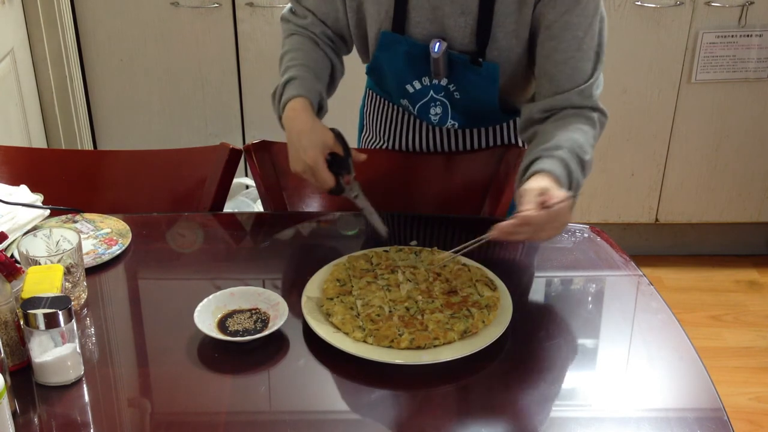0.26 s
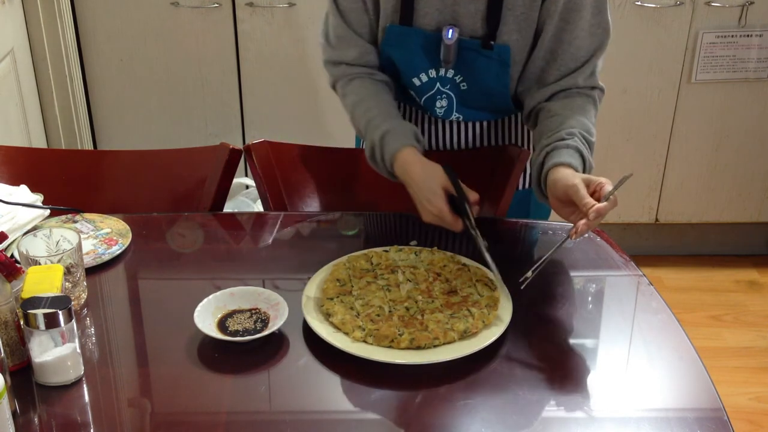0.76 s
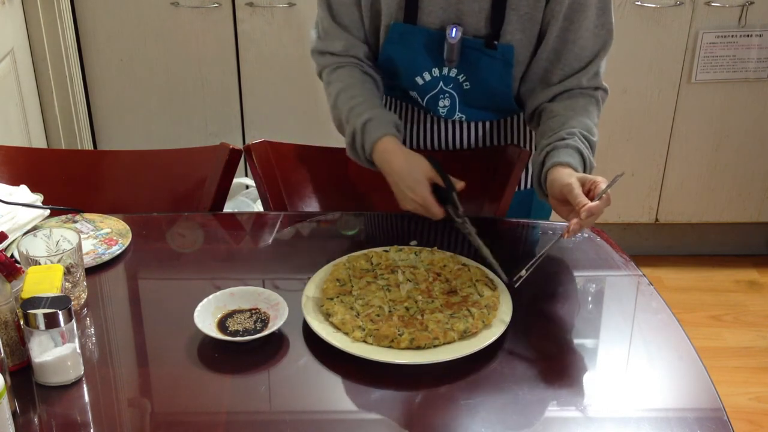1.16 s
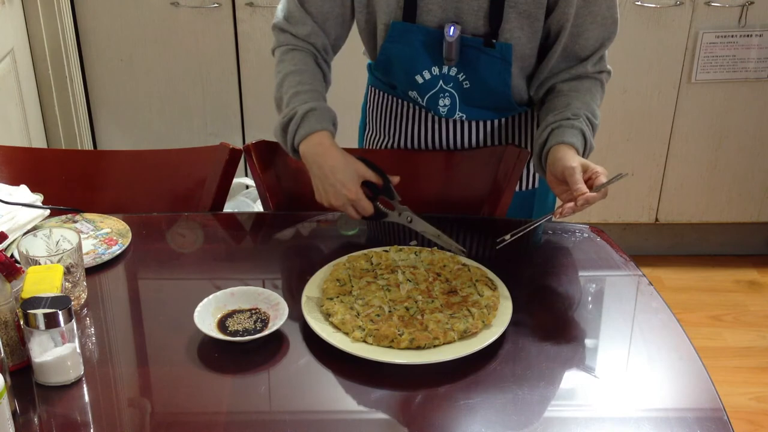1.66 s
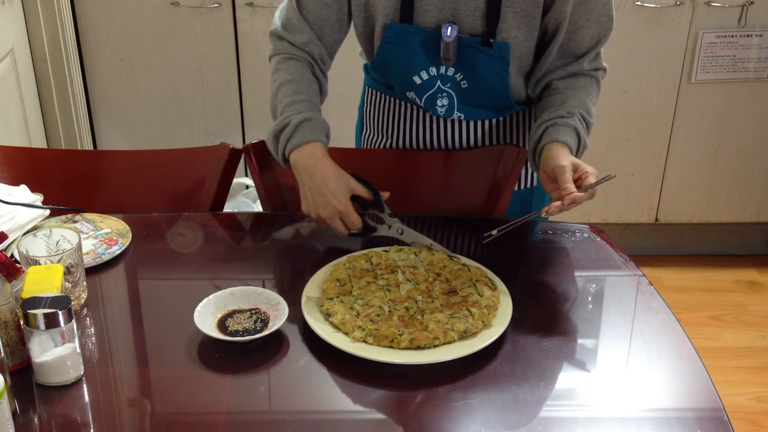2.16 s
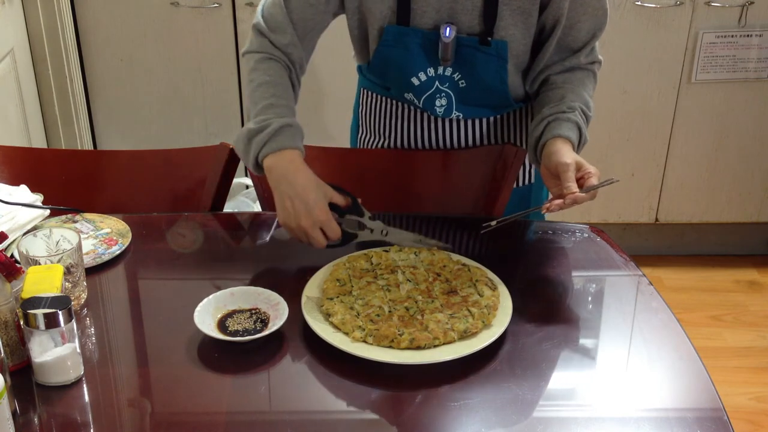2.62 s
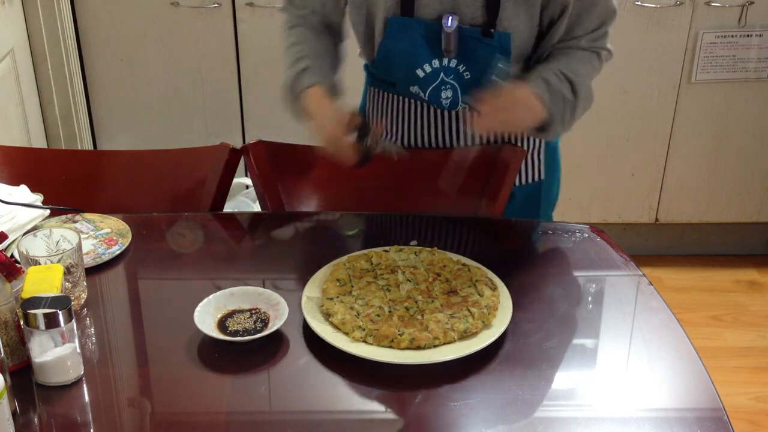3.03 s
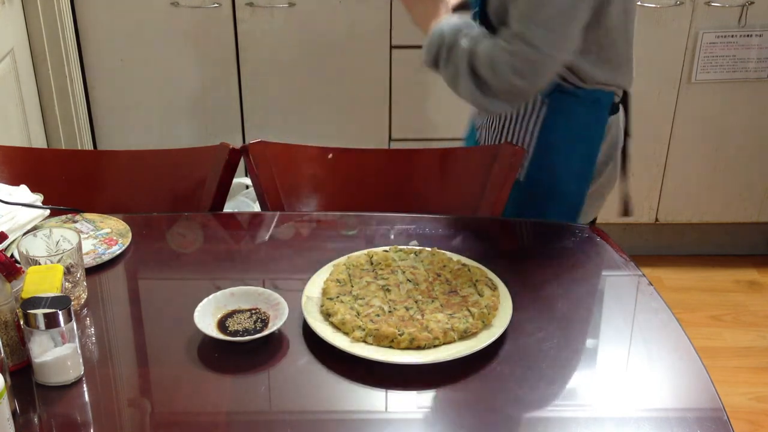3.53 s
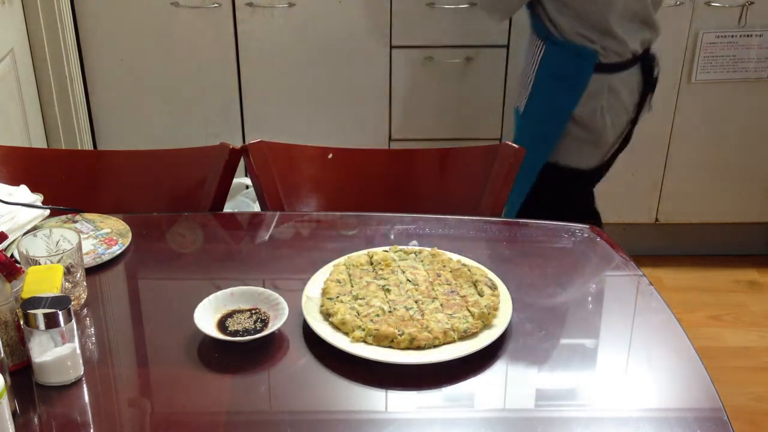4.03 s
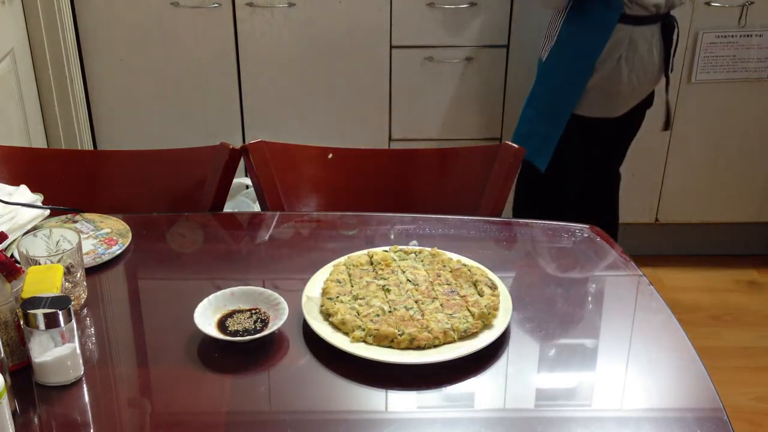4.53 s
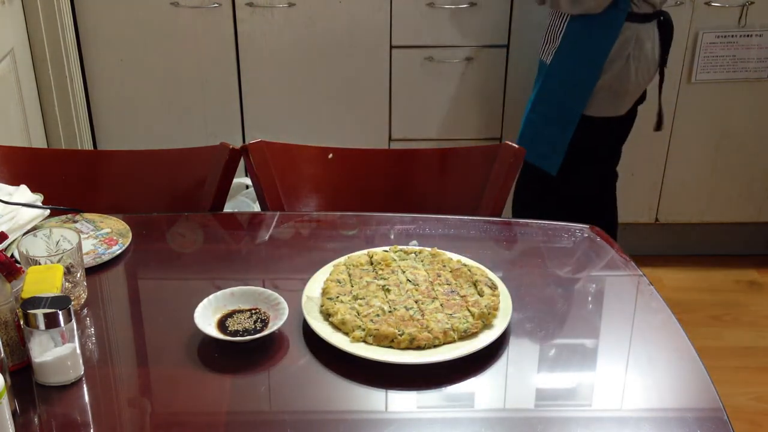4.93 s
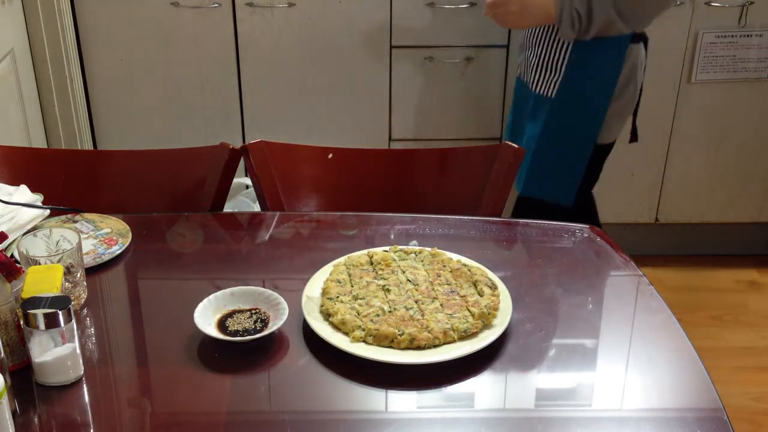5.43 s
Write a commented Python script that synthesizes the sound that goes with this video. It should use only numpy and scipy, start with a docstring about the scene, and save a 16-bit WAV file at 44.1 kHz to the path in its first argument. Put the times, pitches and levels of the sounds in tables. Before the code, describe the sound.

Sparse ceramic knocks and a brief gritty scrape, bright metal clinks in the hand, then clattering cutlery in a drawer, over quiet room hum.

```python
"""Kitchen scissors tap and scrape the rim of a ceramic plate: noise cracks ring its modes, dense grit is the drag.
Then they clink against steel chopsticks in the hand, where cracks ring the steel; fingers stop the early rings.
Last a cutlery drawer is opened and closed: its cutlery clatters in grains and tinkles, filtered noise booms.
Hollow knocks run through it and a small kitchen answers with a decaying noise echo; shaped noise makes the
room air, the fridge hum and the rustle of clothes underneath. Mono microphone."""
import sys
import numpy as np
from scipy import signal
from scipy.fft import rfft, irfft, next_fast_len
from scipy.io import wavfile
from scipy.ndimage import map_coordinates

SR = 44100
rng = np.random.default_rng(int(sys.argv[2]) if len(sys.argv) > 2 else 0)


def master(y):
    """Save y as 16-bit WAV."""
    cut = np.clip(np.atleast_2d(y).T, -1, 1)
    pcm = np.round(cut * 32767)  # scale
    wavfile.write(sys.argv[1], SR, pcm.astype(np.int16))


N = 250488

# ringing modes of the plate: pitch_hz
PLATE_PITCHES = [575, 1140, 1249, 1421, 1490, 1680, 2030, 2250, 2417, 2842, 3187, 3628, 3663, 4390, 4420,
                 5181, 6015, 6907, 7890, 8920, 10045, 11220, 12550, 13870]
# how each plate mode rings: relative_level_db, t60_s (before the sustain factor of the tap)
PLATE_DECAYS = [(-0.5, 0.15), (-10, 0.5), (-14, 0.39), (-1, 0.079), (-6, 0.083), (-4.5, 0.13), (-16, 0.2),
                (-13, 0.21), (-23.5, 0.12), (1, 0.099), (-3, 0.053), (-4.5, 0.11), (1, 0.17), (-11.5, 0.33),
                (-7.5, 0.22), (-6.5, 0.14), (-8.5, 0.23), (-17, 0.34), (-1.5, 0.088), (-12, 0.26),
                (-15, 0.13), (-17.5, 0.16), (-40, 0.11), (-31, .1)]
# colour of the ceramic crack and scrape: frequency_hz, relative_level_db
CERAMIC_COLOUR = [(120, -83), (200, -18), (842, -18), (1480, -4.5), (2560, -20.5), (3610, -4.5),
                  (4100, -21.5), (7090, -23.5), (8050, -29.5), (12900, -33.5), (15500, -78)]
# colour of the cutlery clatter: frequency_hz, relative_level_db
CLATTER_COLOUR = [(710, -34), (1200, -21), (1860, -25.5), (2620, -11), (3010, -15.5), (4480, -2.5),
                  (5730, -9), (10800, -18.5), (14100, -30.5), (15500, -104)]


def amp(db):
    """Turn dB into gain."""
    return 10 ** (np.asarray(db) / 20)


def unit(x):
    """Bring x to rms 1."""
    return x / np.sqrt(np.mean(x ** 2) + 1e-20)


def along(points, hz):
    """Read (Hz, value) points at hz, straight lines on a log frequency axis."""
    point_hz, value = np.transpose(points)
    return np.interp(np.log(hz + 1), np.log(point_hz + 1), value)


def curves(rows):
    """Draw one dB curve for each column after the time; silent outside the table."""
    time_s, *columns = np.transpose(rows)
    t = np.arange(N) / SR
    return [np.interp(t, time_s, column, left=-150, right=-150) for column in columns]


def wobble(rate):
    """A smooth random curve, rate knots a second."""
    knots = rng.standard_normal(int(N * rate / SR) + 4)
    return map_coordinates(knots, [np.arange(N) * rate / SR])


def filtered(x, response):
    """Shape x by a complex response of frequency."""
    size = next_fast_len(N + SR // 2)
    return irfft(rfft(x, size) * response(np.fft.rfftfreq(size, 1 / SR)), size)[:N]


def resonances(peaks):
    """Causal response of (Hz, width Hz, dB) resonances in parallel, with alternating signs."""
    def response(f):
        total = 0
        for k, (centre, width, db) in enumerate(peaks):
            peak = 1j * f * width / (centre * centre - f * f + 1j * f * width)
            total = total + (-1) ** k * amp(db) * peak
        return total
    return response


def noise(spectrum, grain_db):
    """Coloured noise of rms 1, its level flickering in grains of a few ms."""
    flickering = rng.standard_normal(N) * amp(grain_db * wobble(150))
    return unit(filtered(flickering, lambda hz: amp(along(spectrum, hz))))


def grit(rate, spread_db):
    """Tiny impacts, rate a second, with strengths spread at random; rms 1."""
    hits = rng.random(N) < rate / SR
    return unit(hits * rng.standard_normal(N) * amp(spread_db * rng.exponential(size=N)))


def swells(full_strength_s, hold_s, db, rise, fall):
    """Summed gains that rise to db before full_strength_s, hold and fall away; rise and fall in dB a second."""
    t = np.arange(N) / SR - np.asarray(full_strength_s)[:, None]
    before = np.maximum(-t, 0)
    after = np.maximum(t - np.reshape(hold_s, (-1, 1)), 0)
    drop = np.minimum(before * rise + after * fall, 200)
    return amp(np.asarray(db)[:, None] - drop).sum(axis=0)


def strikes(events, modes, colour, contact, scatter_db, free_db, damped_s=0):
    """Each contact cracks and rings the modes at new strengths; the grip leaves two modes freer than the rest."""
    grip_db_per_s = 1200  # from damped_s on, for whatever was struck before it
    out = np.zeros(N + SR)
    t = np.arange(SR // 3) / SR
    f = np.fft.rfftfreq(len(t), 1 / SR)
    hz, level_db, t60 = np.transpose(modes)[:, :, None]
    # crack t60 (s), ring tilt (dB per octave), share of the brightness that the ring follows
    crack_s, ring_tilt_db, ring_follows = contact
    for start_s, peak_db, tilt_db, ring_db, sustain, *free_hz in events:
        nearness = np.exp(-(np.log(hz / free_hz) / .04) ** 2)
        free = nearness.max(axis=1, keepdims=True)
        tilt = ring_tilt_db + ring_follows * tilt_db
        strength = level_db + tilt * np.log2(hz / 4000) + free_db * free
        strength = strength - strength.max() + rng.normal(0, scatter_db, hz.shape)

        decaying = amp(strength - 60 * t / (t60 * sustain))
        ring = (decaying * np.sin(2 * np.pi * hz * t)).sum(axis=0)
        gripped_s = np.maximum(start_s + t - damped_s, 0) * (start_s < damped_s)
        ring = ring * amp(-grip_db_per_s * gripped_s)

        crack_db = along(colour, f) + tilt_db * np.log2(f / 4000 + 0.33)
        burst = irfft(rfft(rng.standard_normal(len(t))) * amp(crack_db))
        crack = burst * amp(-60 * t / crack_s) * (1 - np.exp(-t / 0.00016))
        crack = crack / np.abs(crack).max()
        out[round(start_s * SR):][:len(t)] += amp(peak_db) * crack + amp(peak_db + ring_db) * ring
    return out[:N]


def rim_taps():
    """The blade knocks the plate: a short ceramic crack sets its modes ringing."""
    # blade on plate: start_s, crack_peak_db, brightness_db_per_octave, ring_under_peak_db,
    # sustain_factor, free_mode_hz, second_free_mode_hz
    taps = [(.9155, -8.5, 2.5, -16.5, 1.15, 10045, 7890), (1.288, -12, 2.5, -14, 0.76, 3580, 6015),
            (1.742, -10, -1, -19, .43, 1140, 1421), (1.849, -15.5, -3, -11.5, 0.26, 3650, 575),
            (1.951, -35, 5, -14, 0.77, 3640, 7890), (1.96, -34, -6, -17, .66, 3187, 6015),
            (1.975, -33.5, 5, -15, 0.78, 3520, 8920), (1.99, -18.5, 3, -22, .67, 8920, 7890),
            (2.0, -17.5, 0, -15, 0.71, 2842, 6015), (2.151, -35, -3.5, -24, .65, 3640, 4420),
            (2.218, -35.5, 7, -6, 0.98, 3700, 575), (2.234, -25.5, -2, -10, 0.28, 3700, 575),
            (2.32, -29.5, -7, -7, 0.76, 575, 3640), (2.364, -30, -3, -15, 0.9, 3750, 1249),
            (2.584, -51.5, 4, -8.5, 1.3, 4420, 6907), (2.66, -33.5, 2.5, -9.5, 0.74, 6015, 7890)]
    modes = np.column_stack([PLATE_PITCHES, PLATE_DECAYS])
    return strikes(taps, modes, CERAMIC_COLOUR, contact=(0.013, 1.7, 1.02), scatter_db=2.23, free_db=7.0)


def scrape():
    """The blade skips over the glaze: dense grit, heard bare and through the plate's modes, which the blade damps."""
    # drags over the rim: full_strength_s, hold_s, grind_db and body_db (both ahead of the plate's response)
    drags = [(1.992, 0.0072, -23, -72), (2.124, 0.018, -46.5, -61), (2.225, .018, -30, -49),
             (2.27, .025, -48, -64), (2.32, 0.032, -36, -50), (2.4, 0.012, -41.5, -66),
             (2.652, .01, -43, -72)]
    drag_rise, drag_fall, rock_fall = 1400, 750, 950  # dB per s
    full_strength_s, hold_s, grind_db, body_db = np.transpose(drags)
    grind_gain = swells(full_strength_s, hold_s, grind_db, drag_rise, drag_fall)
    push_gain = swells(full_strength_s, hold_s, body_db, drag_rise, rock_fall)
    skipping = grit(2200, spread_db=1.5) * amp(2.7 * wobble(70))

    damped_modes = []
    for hz, (db, t60) in zip(PLATE_PITCHES, PLATE_DECAYS):
        damped_modes.append((hz, 7 / t60, db - 20 * np.log10(1 / t60)))
    ringing = resonances(damped_modes)

    def rim_response(hz):
        return amp(10.5 + along(CERAMIC_COLOUR, hz)) + amp(26) * ringing(hz)

    rim = filtered(grind_gain * skipping, rim_response)
    # the whole plate rocks on the table
    rocking = filtered(push_gain * skipping, resonances([(PLATE_PITCHES[0], 120, 20.5)]))
    return rim + rocking


def hand_clinks():
    """Steel on steel in the hand: a bright tick rings the metal; fingers stop the early rings at damped_s."""
    # clinks: start_s, crack_peak_db, brightness_db_per_octave, ring_under_peak_db,
    # sustain_factor, free_mode_hz, second_free_mode_hz
    clinks = [(2.55, -42.5, -5, -40, .32, 6476, 11430), (3.034, -29.5, -10.5, -45, 0.27, 4240, 7849),
              (3.091, -44, -14.5, -30, .4, 5556, 6476), (3.2273, -12.5, -2, -22.5, 1.8, 5556, 3360),
              (3.2645, -22, 3, -19, .6, 3400, 10900), (3.2715, -15.5, -3, -17.5, 1, 3400, 10800),
              (3.2885, -28.5, 0, 0, 1.5, 4240, 7849), (3.423, -29.5, -2.5, -11, 0.29, 3930, 9200),
              (3.46, -44, 1, -18, .6, 9200, 14300), (3.479, -18, -4, -13, 0.74, 4240, 10000),
              (3.492, -25, -4.5, -15, 1.7, 4240, 12600), (3.507, -35, -4, -15.5, 0.92, 4240, 10900),
              (3.5, -32.5, -3, -9.5, 0.93, 2300, 11430), (3.52, -36, -6, -1, 0.92, 4240, 12600),
              (3.528, -29, 1, -18, 0.86, 3930, 3930), (3.818, -16.5, -1.5, -11, 0.58, 3930, 14300),
              (3.873, -20.5, -1.5, -21, .47, 3200, 9200), (4.046, -41, -5, -40, .5, 5556, 9200),
              (4.071, -30, 4, -19, 0.65, 6476, 8400), (4.0765, -11, 4, -3, 0.79, 10000, 8400),
              (4.082, -12.5, 7, -22, .37, 10000, 8400), (4.1215, -16.5, 3, -4.5, 1.02, 6476, 11430),
              (4.138, -39, -1, -28, .6, 6476, 8400)]
    # ringing modes of the steel: pitch_hz
    steel_pitches = [2300, 3200, 3400, 3930, 4240, 5556, 6476, 7849, 8400, 9200, 10000, 10900, 11430, 12600,
                     14300]
    # how each steel mode rings: relative_level_db, t60_s (before the sustain factor)
    steel_decays = [(-9.5, 0.023), (-9, 0.049), (-22.5, 0.046), (-12, 0.066), (-8.5, 0.039), (-14, 0.29),
                    (5, 0.036), (-8, 0.095), (1.5, 0.056), (-5, 0.14), (10, 0.025), (-32, .06),
                    (-30, 0.057), (-5, 0.07), (0, 0.056)]
    # colour of the steel crack: frequency_hz, relative_level_db
    tick_colour = [(88, -55), (150, -33), (2340, -18), (5520, -2.5), (6320, 2), (7110, 0.5), (8310, 2.5),
                   (9160, -7.5), (10100, -3), (14600, -7), (15800, -43)]
    modes = np.column_stack([steel_pitches, steel_decays])
    return strikes(clinks, modes, tick_colour, contact=(0.017, -1.3, 0.87), scatter_db=4.5, free_db=22.5,
                   damped_s=3.335)


def drawer():
    """A cutlery drawer is opened and closed; its loose cutlery clatters and the drawer booms. Jolts stir both."""
    # how loud the cutlery clatters: time_s, clatter_db
    clatter_curve = [(4.525, -68), (4.54, -50), (4.77, -45), (4.79, -30), (4.945, -29.5), (5.04, -56.5),
                     (5.09, -86), (5.15, -62), (5.29, -41.5), (5.36, -55), (5.46, -78), (5.55, -93)]
    # resonances of the loose cutlery: pitch_hz, width_hz, relative_level_db
    cutlery_modes = [(2075, 47, 3.5), (2600, 200, -12), (2960, 22, 0), (3070, 19, -1), (3800, 29, -14),
                     (4417, 160, 5), (5160, 78.6, -6), (5720, 40, 4.5), (6360, 80, 3.5), (6370, 31, -16),
                     (7240, 45, 2.5), (8750, 43, -18), (9900, 450, -27), (10600, 100, -23),
                     (10600, 160, -9), (11700, 220, -24), (12400, 21, -26), (12800, 58, -23),
                     (13100, 39, -28), (13300, 22, -32), (13600, 76, -38), (13800, 71, -32)]
    # resonances of the drawer: pitch_hz, width_hz, relative_level_db
    drawer_modes = [(138, 12, -17.5), (335.5, 39.5, -9), (485, 42, -9), (581.4, 16.6, 1.5),
                    (1029, 85, -14.5), (1640, 130, -22)]
    # jolts: start_s, crack_peak_db, brightness_db_per_octave, ring_under_peak_db,
    # free_mode_hz, second_free_mode_hz, boom_db
    jolt_rows = [(4.5324, -14, 6, -18.5, 4780, 3140, -44.5), (4.6452, -15.5, -6, -9, 4400, 5050, -30.5),
                 (4.782, -15.5, -6, -23, 4370, 6150, -46), (5.046, -46, -4, -25, 4400, 5300, -40.5),
                 (5.1025, -27.5, -8, -19, 3750, 6330, -38.5), (5.145, -22, 4, -16, 3850, 6000, -49),
                 (5.1591, -26.5, -11, -8, 4570, 5500, -37), (5.22, -23.5, 0, -20, 4446, 6320, -40.5),
                 (5.2772, -19, -4, -23, 4400, 6230, -27), (5.3379, -30.5, -11, -24, 4540, 5350, -39.5),
                 (5.4238, -49, -4, -8, 4900, 6900, -75), (5.4712, -48, 4, -11, 4860, 5560, -75),
                 (5.608, -48.5, 9, -32, 4960, 6500, -68)]
    start_s, peak_db, tilt_db, ring_db, free_hz, second_hz, boom_db = np.transpose(jolt_rows)

    moving = amp(curves(clatter_curve)[0])
    # around a jolt: clatter 16 dB under its peak, boom 8.9 ms late; both hold 12 ms, rise and fall in dB per s
    stirred = swells(start_s, .012, peak_db - 16, rise=4000, fall=350)
    boomed = swells(start_s + 0.0089, 0.012, boom_db, rise=1300, fall=470)
    clatter_gain = moving + stirred
    boom_gain = amp(-5) * moving + boomed

    flickering = grit(5000, spread_db=-2.5) * amp(1.44 * wobble(60))
    grains = filtered(flickering, lambda hz: amp(along(CLATTER_COLOUR, hz)))
    metallic = unit(filtered(grains, resonances(cutlery_modes)))
    clatter = unit(unit(grains) + amp(-1) * metallic)
    boom = unit(filtered(rng.standard_normal(N) * amp(2.3 * wobble(40)), resonances(drawer_modes)))

    modes = [(hz, db, 3.4 / width) for hz, width, db in cutlery_modes]  # a wide resonance dies fast
    sustain = np.ones_like(start_s)
    rows = np.column_stack([start_s, peak_db, tilt_db, ring_db, sustain, free_hz, second_hz])
    jolts = strikes(rows, modes, CLATTER_COLOUR, contact=(0.034, .4, .01), scatter_db=4, free_db=34)
    rattle = clatter_gain * clatter + amp(10.5) * tinkles(clatter_gain, count=900, t60=0.084)
    return rattle + boom_gain * boom + jolts


def tinkles(gain, count, t60):
    """Many small pieces touch and ring briefly, each at its own pitch."""
    when, pitch, size, life = rng.random((count, 4)).T[:, :, None]
    audible = gain > 3e-5  # touches fall only where the cutlery clatters
    start = np.searchsorted(np.cumsum(audible), 1 + when * (audible.sum() - 1))
    hz = 2400 * amp(15 * pitch)
    sample = np.arange(SR // 12)
    t = sample / SR
    level_db = along(CLATTER_COLOUR, hz) - 25.5 * size - 60 * t / (t60 * (0.3 + life))
    notes = gain[start] * amp(level_db) * np.sin(2 * np.pi * hz * t)
    return np.bincount((start + sample).ravel(), notes.ravel(), N + SR)[:N]


def knock():
    """Damped hollow notes of table, handles and drawer."""
    # hollow knocks: start_s, level_db, pitch_hz, t60_s
    knocks = [(1.23, -35.5, 268, 0.023), (3.160, -38.5, 973, 0.048), (3.227, -23, 263, 0.01),
              (4.075, -33, 243, 0.022), (5.047, -32, 627, 0.04), (5.29, -35.5, 146.3, 0.22),
              (5.54, -47, 122, 0.044)]
    start_s, level_db, hz, t60 = np.transpose(knocks)[:, :, None]
    t = np.maximum(np.arange(N) / SR - start_s, 0)
    soft_onset = 1 - np.exp(-t / 0.0022)
    return (amp(level_db - 60 * t / t60) * np.sin(2 * np.pi * hz * t) * soft_onset).sum(axis=0)


def kitchen(x, turn_s=.3):
    """Each frequency of the echo dies at its own speed; the echo pattern is drawn anew every turn_s."""
    # decay of the room: frequency_hz, t60_s
    room_decay = [(200, 0.65), (1500, 0.47), (3000, 0.32), (7000, 0.28), (14000, 0.16)]
    out = np.zeros(N + SR)
    step = round(turn_s * SR)
    for start in range(0, N, step):
        hz, t, cells = signal.stft(rng.standard_normal(SR // 2), SR, nperseg=256)
        dying = cells * amp(-60 * t / along(room_decay, hz)[:, None])
        tail = signal.istft(dying, SR, nperseg=256)[1]
        wet = signal.fftconvolve(x[start:start + step], tail / np.linalg.norm(tail))
        out[start + 150:][:len(wet)] += wet  # the echo starts 150 samples late
    return out[:N]


def background():
    """Steady room air and fridge hum; clothes rustle and feet shuffle as the cook moves."""
    # clothes and steps: time_s, shuffle_db, rustle_db
    movement = [(0.0, -63, -77), (0.33, -65.5, -83), (0.87, -63, -69), (1.58, -65, -82), (2.39, -62.5, -70),
                (2.7, -65.5, -79.5), (3.02, -63.5, -69.5), (3.45, -63, -63.5), (3.89, -59.5, -75),
                (4.08, -61.5, -55), (4.22, -66, -64.5), (4.35, -53.5, -54), (4.55, -66, -70),
                (5.3, -52.5, -60), (5.46, -60, -68), (5.68, -66.5, -65)]
    # colour of the shuffling feet: frequency_hz, relative_level_db
    shuffle_colour = [(100, -51), (250, -1.5), (500, 2), (1200, 0.5), (2500, -10.5), (5000, -38)]
    # colour of the clothes: frequency_hz, relative_level_db
    rustle_colour = [(1000, -31), (2500, -3.5), (4500, -6.5), (6500, -2), (9000, -8.5), (15000, -24)]
    # colour of the room air: frequency_hz, relative_level_db
    air_colour = [(15, -82), (25, -44), (117, -20), (141, -11), (180, -5), (212, -8.5), (294, -4),
                  (418, -8), (519, -16), (594, -10), (1490, -29.5), (1620, -26), (7170, -26), (14500, -31),
                  (16200, -67.5)]
    # fridge hum: pitch_hz, width_hz (of one filter pass), level_db
    fridge_hum = (188, 2.9, -66.5)
    shuffle_db, rustle_db = curves(movement)
    hz, width, hum_db = fridge_hum
    narrow = resonances([(hz, width, 0)])
    hum = unit(filtered(rng.standard_normal(N), lambda f: narrow(f) ** 2))  # two passes
    shuffle = amp(shuffle_db) * noise(shuffle_colour, grain_db=1.0)
    rustle = amp(rustle_db) * noise(rustle_colour, grain_db=1.5)
    air = amp(-59.5) * noise(air_colour, grain_db=0.83)
    return air + amp(hum_db) * hum + shuffle + rustle


def scene():
    """Near sources, their echo and the background, alike in both channels."""
    struck = rim_taps() + scrape() + hand_clinks() + drawer()
    small = filtered(struck, lambda hz: (1j * hz / (1j * hz + 130)) ** 2)  # small things send out no bass
    near = small + knock()
    return np.tile(near + amp(-12.5) * kitchen(near) + background(), (2, 1))


def record(dry):
    """The microphone loses the bass and keeps nothing from its band limit up."""
    top_hz = 16000
    kept = filtered(dry[0], lambda hz: (1j * hz / (1j * hz + 90)) ** 2 * (hz < top_hz))
    return np.tile(kept, (2, 1))


dry = scene()
out = record(dry)
master(out)
```